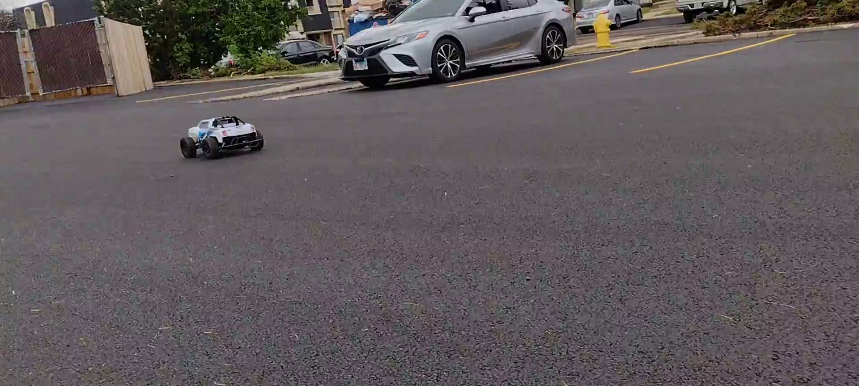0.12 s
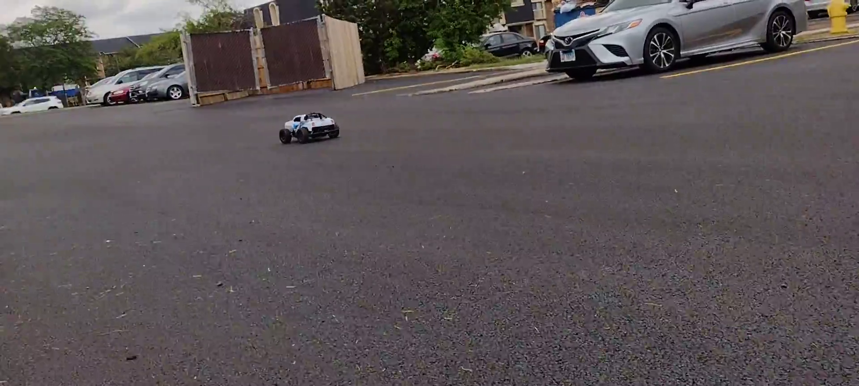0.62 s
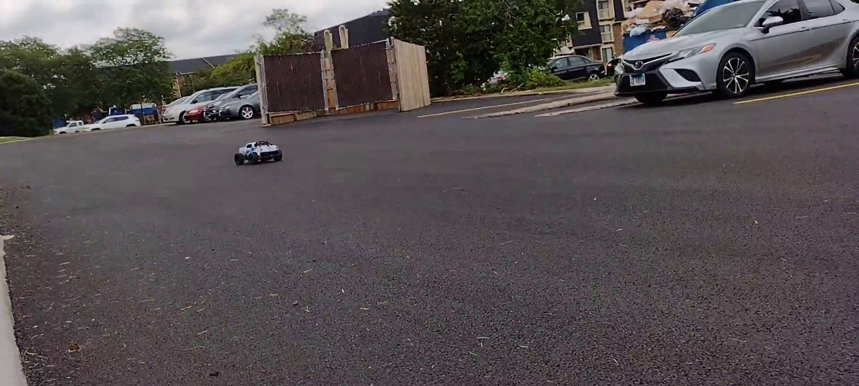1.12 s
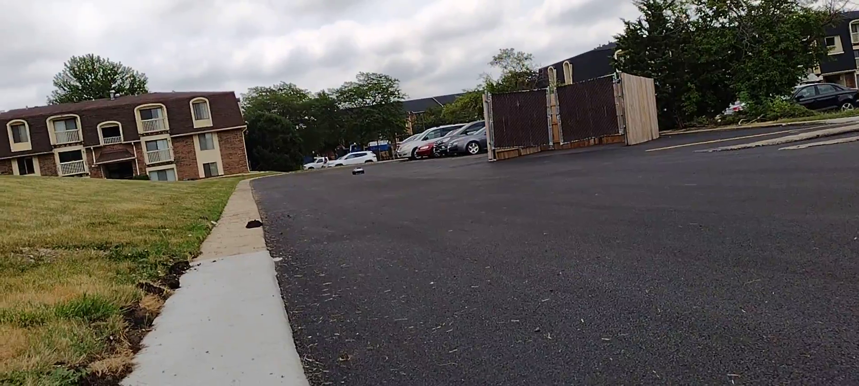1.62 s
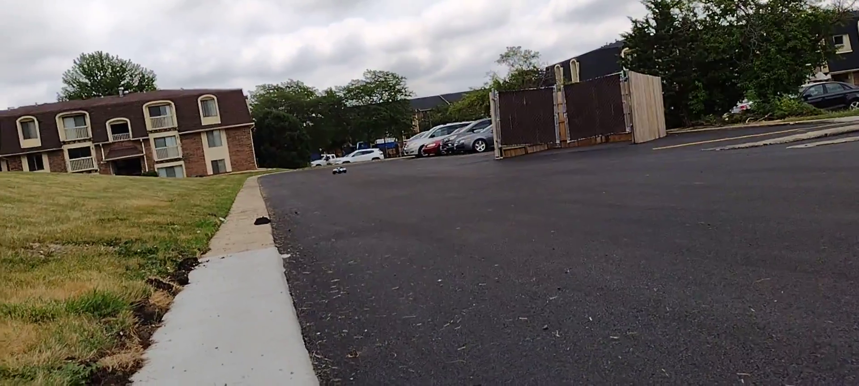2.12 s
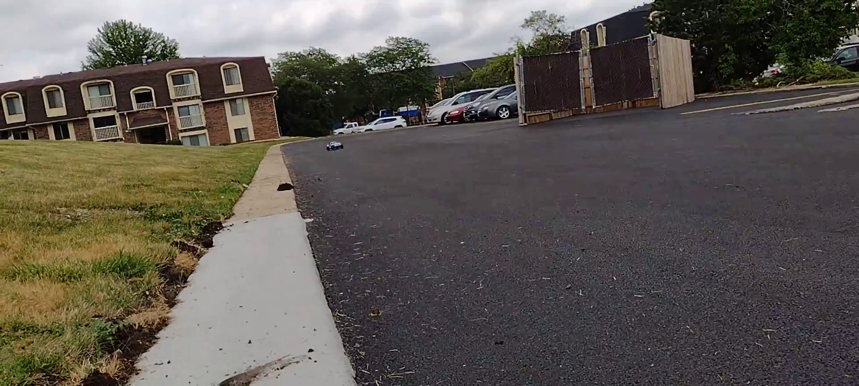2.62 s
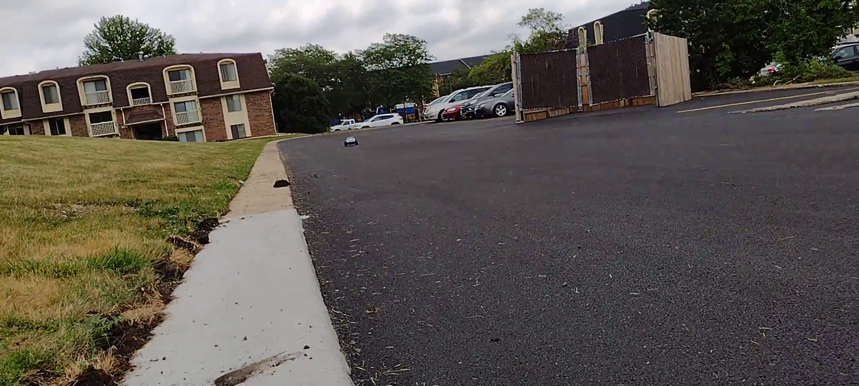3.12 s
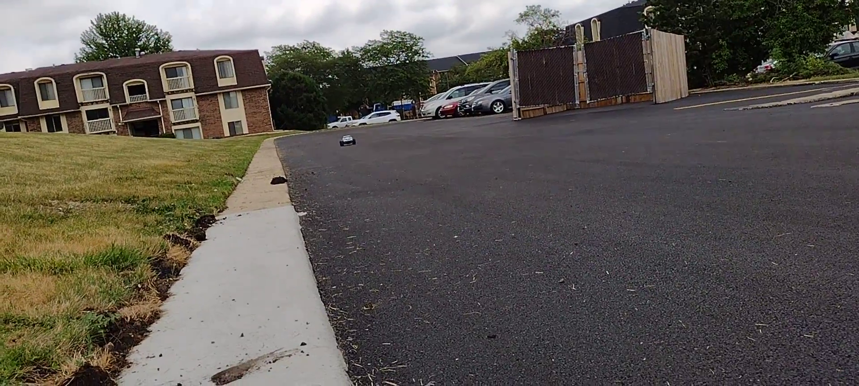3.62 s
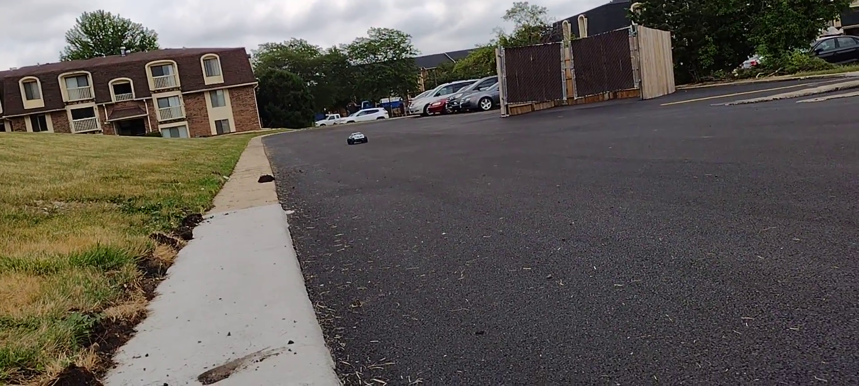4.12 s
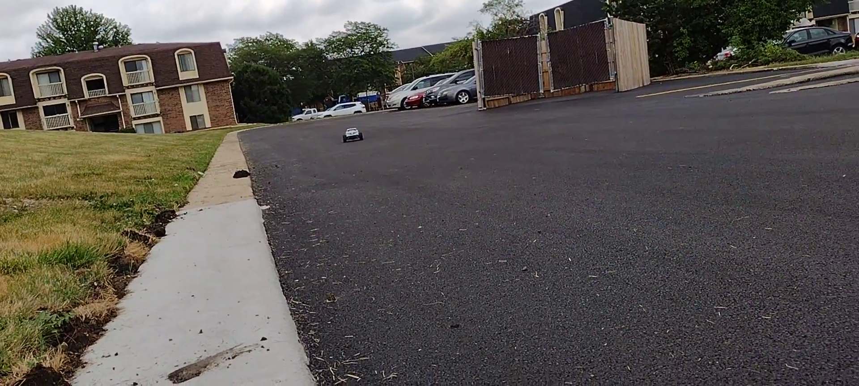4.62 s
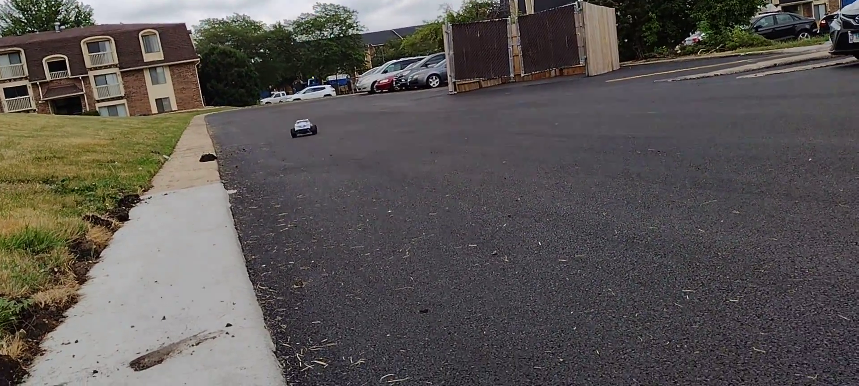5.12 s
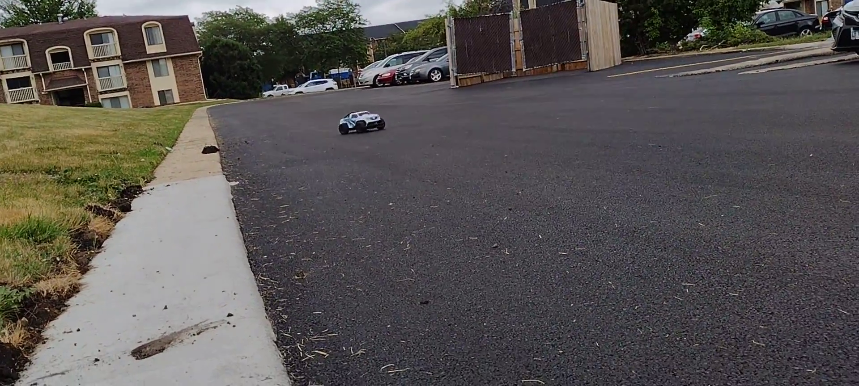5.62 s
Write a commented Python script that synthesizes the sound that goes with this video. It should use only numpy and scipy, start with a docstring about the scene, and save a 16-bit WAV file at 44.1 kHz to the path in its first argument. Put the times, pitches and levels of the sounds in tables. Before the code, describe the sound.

Outdoors on an asphalt lot, a small electric toy truck starts close with a bright, rough gear whine, squealing shaft and grainy tyre hiss, then drives away. The sound drops to silence twice. The truck almost vanishes under low machine hum and distant traffic while sparrows chirp, then approaches with swelling whine and ticking grit. Stereo microphone, left side dull, right side bright.

```python
"""A small electric model truck drives off across an asphalt lot and comes back, gears whining, tyres hissing:
wobbling, roughened tones for gears, motor and shaft, grainy coloured noise and ticks for the tyres.
A machine hums nearby in narrow tones; a faint tone swells over noise for distant traffic and light wind.
Sparrows chirp in gliding whistles and decaying sines knock near the microphone; the sound drops out twice.
The left microphone port is shaded and dull, the right one bright."""
import sys
import numpy as np
from scipy import signal
from scipy.fft import rfft, irfft, next_fast_len
from scipy.io import wavfile
from scipy.ndimage import uniform_filter1d

SR = 44100
rng = np.random.default_rng(int(sys.argv[2]) if len(sys.argv) > 2 else 0)


def volts_from_db(level):
    """Convert decibel levels to linear amplitude ratios."""
    exponent = np.asarray(level, float) / 20
    return 10 ** exponent


def store_pcm(level_fs):
    """Save levels as 16-bit WAV."""
    pcm = np.round(np.clip(level_fs, -1, 1) * 32767).astype(np.int16)
    wavfile.write(sys.argv[1], SR, np.atleast_2d(pcm).T)


N = 253575
T = np.arange(N) / SR  # s

# Stretches with sound. Each row: start in seconds, end in seconds.
HEARD = [(.0695, 1.1705), (1.4703, 2.4305), (2.7695, 5.76)]
# Gear mesh whine, one list a stretch. Each row: time in seconds, pitch in Hz, whine level in dB before
# the core and skirt trims, tyre hiss level in dB before its grain and mix.
GEARS = [
    [(.075, 2548, -45.5, -43), (.3, 2550, -48, -46), (.33, 2582, -48, -53), (1.165, 2558, -50.5, -56)],
    [(1.475, 2449, -49, -68), (1.6, 2452, -47.5, -69), (1.81, 2517, -48.5, -68), (1.93, 2476, -48, -69),
     (1.99, 2375, -50.5, -69), (2.28, 2375, -56.5, -74), (2.425, 2312, -73, -67.5)],
    [(2.77, 2426, -76, -76), (3.7, 2434, -68, -77.5), (4.05, 2312, -57, -71), (4.25, 2283, -58, -74),
     (4.4, 2364, -52.5, -75.5), (4.7, 2390, -47, -70.5), (4.98, 2494, -42.5, -63.5),
     (5.3, 2493, -39.5, -59.5), (5.42, 2573, -40.5, -58.5), (5.49, 2495, -39, -59),
     (5.58, 2527, -36.5, -56.5), (5.75, 2484, -39.5, -54.5)],
]
# Overtones of the gear mesh, which fade with distance like the hiss.
# Each row: multiple of the pitch, level in dB against the tyre hiss once the truck faces the microphone.
MESH_OVERTONES = [(3, -5), (4, -10), (5, -11), (6, -30)]
# Boom of the plastic body. Each row: pitch in Hz, a third of the blur in Hz, level in dB against the gears.
SHELL_MODES = [(586, 98, -16.5), (912, 65, -12.5), (1230, 41, -19)]
# Motor whine under load. Each row: time in seconds, pitch in Hz, level in dB before a trim.
MOTOR = [
    [(.075, 1620, -48.5), (.45, 1697, -49.5), (1.165, 1806, -61.5)],
    [(2.375, 1830, -52.5), (2.43, 1847, -61)],
    [(2.8, 1684, -68), (3.4, 1830, -61), (3.8, 1850, -79)],
]
# Upper whine, lower in pitch as the truck nears. Each row: time in seconds, pitch in Hz, level in dB.
UPPER = [
    [(.075, 5140, -81), (.35, 5384, -61), (.7, 5200, -70)],
    [(5.15, 5150, -69), (5.3, 5280, -63), (5.5, 5050, -61), (5.68, 4850, -60), (5.75, 4950, -59)],
]
# Drive shaft squeal. Each row: time in seconds, pitch in Hz, level in dB before a trim.
SHAFT = [
    [(.085, 3268, -39), (.52, 3360, -41.5), (.58, 3385, -52), (.95, 3460, -48.5)],
]
# Colour of the tyre hiss. Each row: frequency in Hz, relative density in dB per Hz.
TYRES = [(1760, -32.5), (3000, 13), (3350, 7), (4470, -7), (5160, 0.5), (6390, -16), (7400, -13.5),
         (8410, -1.5), (11300, -1), (13200, -11), (14600, -23), (15800, -45.5)]
# Grit under the tyres. Each row: start in seconds, level in dB before colouring.
GRIT = [(1.0615, -57), (3.3922, -65), (4.4726, -69), (4.9716, -57), (5.17, -57), (5.254, -48),
        (5.3435, -52), (5.3886, -51), (5.6185, -51), (5.6344, -49), (5.689, -56)]
# Colour of the grit. Each row: frequency in Hz, gain in dB.
GRIT_COLOUR = [(1000, -30), (3000, -6), (6000, -2), (8500, 6), (11500, 9), (13500, 4), (15500, -16)]
# Machine hum. Each row: time in seconds, mean main tone level in dB, mean lower tone level in dB.
HUM = [(.075, -37, -41.5), (1.15, -34, -41.5), (1.6, -32, -52), (2.4, -37.5, -43.5), (2.8, -41, -51),
       (3.65, -42, -43), (4.0, -43.5, -42.5), (5.0, -42, -47), (5.4, -45.5, -69), (5.75, -54.5, -41)]
# Weak partials of the machine. Each row: frequency in Hz, mean level in dB.
HUM_PARTIALS = [(163, -51.5), (286, -55), (572, -61.5), (1224, -80.5), (1335, -72.5), (1558, -69.5)]
# Swells of the faint tone. Each row: middle in seconds, half length in seconds, level in dB at the middle.
FAR_TONE = [(3.37, 0.39, -55.5), (4.312, 0.28, -54)]
# Colour of the distant traffic. Each row: frequency in Hz, relative density in dB per Hz.
TRAFFIC = [(18, -54.5), (30, -22.5), (83, -10), (114, 0), (156, -10), (208, -6.5), (284, -8.5), (420, -13),
           (575, -14), (808, -19), (996, -17), (1170, -22.5), (1870, -24.5), (3680, -29), (8000, -52.5),
           (16000, -73)]
# Loudness of the distant traffic. Each row: time in seconds, mean level in dB.
TRAFFIC_DB = [(.075, -40.5), (1.15, -41.5), (2.4, -43), (3.1, -44), (4.5, -43), (5.75, -41)]
# Chirps that climb to a top note and fall again.
# Each row: time of the top in seconds, top in Hz, climb in seconds, fall in seconds, level in dB.
CHIRPS = [(.187, 5110, .004, 0.017, -48.5), (0.221, 5310, 0.015, 0.01, -48),
          (0.292, 4730, 0.021, 0.011, -45), (0.781, 4970, 0.027, 0.049, -49.5),
          (0.813, 4730, 0.011, 0.026, -49.5), (0.895, 4710, 0.022, 0.018, -45.5),
          (1.018, 5500, 0.013, 0.008, -54), (1.056, 4920, 0.0018, 0.04, -53),
          (1.638, 5450, .024, 0.03, -52), (1.662, 4630, 0.0038, 0.017, -57),
          (1.743, 4820, 0.024, .012, -50), (2.345, 5820, 0.023, 0.005, -57),
          (2.345, 4970, 0.00107, 0.0184, -51.5), (2.42, 4820, 0.011, 0.0018, -67),
          (2.811, 5400, 0.01, 0.011, -69), (3.168, 5500, .006, 0.00618, -70),
          (3.193, 4700, 0.002, .011, -63), (3.245, 5710, 0.015, 0.009, -58), (3.332, 5100, .018, .003, -64),
          (3.681, 5330, .016, 0.0047, -58.5), (3.69, 5730, .003, .02, -63),
          (3.755, 4480, .012, 0.0017, -61), (3.979, 4940, 0.021, .001, -63), (4.081, 4300, .016, .001, -53),
          (4.062, 3500, 0.015, .001, -64), (4.468, 5690, .016, 0.015, -53.5),
          (4.55, 5000, 0.026, .001, -58.5), (4.736, 5300, 0.011, 0.025, -53.5),
          (5.7, 5010, 0.0073, 0.019, -54.5)]
# Level pips, slightly arched. Each row: start in seconds, length in seconds, pitch in Hz, level in dB.
PIPS = [(0.13, 0.034, 6300, -59), (1.108, .048, 3230, -46), (1.035, .022, 4900, -53.5),
        (1.644, .014, 5000, -52), (1.704, 0.02, 3500, -50), (3.175, .018, 4750, -61),
        (3.222, .013, 3680, -62), (3.251, .018, 4900, -61), (3.275, .012, 3900, -55),
        (3.298, 0.015, 3850, -55), (3.336, .006, 3700, -60), (3.377, 0.021, 3050, -54.5),
        (3.975, 0.045, 4970, -64), (4.082, .028, 5000, -62), (4.482, 0.015, 4200, -57),
        (4.696, 0.02, 6630, -69)]
# Knocks. Each row: start in seconds, level in dB before onset and decay, pitch in Hz, 60 dB decay in seconds.
KNOCKS = [(.278, -33.5, 604, 0.099), (.298, -31, 636, 0.076), (0.406, -13.5, 124.8, 0.025),
          (2.01, -21, 91.7, 0.11), (5.226, -39, 1230, 0.046), (5.542, -36, 898, .08),
          (5.715, -35, 910, .07)]
# Shading of the left port against the right. Each row: frequency in Hz, gain in dB.
SHADE = [(60, -1.1), (110, -0.65), (200, 0.5), (380, -0.5), (700, 0), (1290, -1.5), (2380, -5), (4400, -14),
         (8120, -16), (15000, -15)]
# Likeness of wide noise at the two ports. Each row: frequency in Hz, likeness from 0 to 1.
ALIKE = [(60, 1), (130, 1), (290, 0.93), (640, 0.76), (1410, 0.37), (3100, 0.2), (6820, 0.12),
         (15000, 0.05)]

TURN_S, TURN_LENGTH_S = 3.7, 0.6  # the truck turns to face the microphone


def on_log(hz, table):
    """Read a (Hz, value) table on a log-frequency axis."""
    f, v = np.transpose(table)
    return np.interp(np.log(np.maximum(hz, 1)), np.log(f), v)


def colour(x, table):
    """Filter by a (Hz, dB) table."""
    n = next_fast_len(N)
    hz = np.arange(n // 2 + 1) * SR / n
    return irfft(rfft(x, n) * volts_from_db(on_log(hz, table)), n)[..., :N]


def unit(x):
    """Scale to rms 1."""
    return x / np.sqrt(np.mean(x ** 2))


def walk(rate):
    """Smooth chance that turns about rate times a second, spread 1."""
    k = max(int(SR / rate), 1)
    return unit(uniform_filter1d(uniform_filter1d(rng.standard_normal(N), k), k))


def curves(tables, edge_s):
    """A gate that opens while each table lasts, then the tables' columns over time."""
    s, *columns = np.transpose(np.concatenate(tables))
    gate = sum(np.clip(np.minimum(T - t[0][0], t[-1][0] - T) / edge_s + 1, 0, 1) for t in tables)
    return np.minimum(gate, 1), *(np.interp(T, s, c) for c in columns)


def whine(hz, rough, blur_hz, wobble_hz):
    """A tone whose pitch wobbles; the rough share of its power is spread into a narrow band."""
    phase = 2 * np.pi * np.cumsum(hz + wobble_hz * walk(36.3)) / SR
    rough = np.clip(rough, 0, 1)
    blur = (walk(blur_hz) + 1j * walk(blur_hz)) / np.sqrt(2)
    envelope = np.sqrt(1 - rough) + np.sqrt(rough) * blur
    return np.sqrt(2) * np.real(envelope * np.exp(1j * phase))


def wide_noise(table):
    """Coloured noise, alike on both ports in the bass and less so in the treble."""
    alike = [(hz, np.clip(c, 0, .99)) for hz, c in ALIKE]
    mid = colour(rng.standard_normal(N), [(hz, 10 * np.log10(1 + c)) for hz, c in alike])
    side = colour(rng.standard_normal(N), [(hz, 10 * np.log10(1 - c)) for hz, c in alike])
    return colour(np.array([mid + side, mid - side]), table)


def late(pair, lag_s):
    """Delay the right port."""
    return np.array([pair[0], np.roll(pair[1], int(lag_s * SR))])


def spread(x, room_db):
    """Both ports, each with its own outdoor scatter."""
    decay = np.exp(-np.arange(6000) / (0.034 * SR))
    tails = rng.standard_normal((2, 6000)) * decay / np.sqrt(0.069 * SR)
    return x + volts_from_db(room_db) * signal.fftconvolve(x[None], tails, axes=1)[:, :N]


def gears():
    """Meshing teeth whine, roughened by unevenness; the overtones beam forward and the body booms along."""
    skirt_db, skirt_gain, near_db = -6, 0.2, -38  # skirt against whine at near_db, extra dB per dB
    away_db = -12  # overtones before the truck turns to face the microphone
    _, hz, db, tyre_db = curves(GEARS, edge_s=.01)
    # a narrow core inside a wide skirt; the skirt gains as the truck gets loud and near
    out = volts_from_db(db - 3) * whine(hz, rough=0.7, blur_hz=230, wobble_hz=6)
    out += volts_from_db(db + skirt_db + skirt_gain * (db - near_db)) * whine(hz, rough=1, blur_hz=400, wobble_hz=10)
    beam_db = away_db * np.clip((TURN_S + TURN_LENGTH_S - T) / TURN_LENGTH_S, 0, 1)
    for k, overtone_db in MESH_OVERTONES:
        overtone = whine(k * hz, rough=1, blur_hz=260 * k, wobble_hz=20)
        out += volts_from_db(tyre_db + beam_db + overtone_db) * overtone
    for mode_hz, blur_hz, mode_db in SHELL_MODES:
        out += volts_from_db(db + mode_db) * whine(mode_hz, rough=0.99, blur_hz=3 * blur_hz, wobble_hz=3)
    return out


def motor():
    """The motor under load: a roughened tone that glides in pitch."""
    gate, hz, db = curves(MOTOR, edge_s=0.045)
    return gate * volts_from_db(db - 0.5) * whine(hz, rough=0.75, blur_hz=260, wobble_hz=8)


def upper_whine():
    """A faint high whine, wholly blurred into a narrow band."""
    gate, hz, db = curves(UPPER, edge_s=0.11)
    return gate * volts_from_db(db) * whine(hz, rough=1.0, blur_hz=300, wobble_hz=30)


def shaft():
    """The drive shaft squeals in one burst a wheel turn."""
    wheel_turns, first_burst_s = 29.1, 0.132  # per second, s
    gate, hz, db = curves(SHAFT, edge_s=0.01)
    burst = np.exp(0.68 * np.cos(2 * np.pi * wheel_turns * (T - first_burst_s)))
    return gate * volts_from_db(db - 2.5) * unit(burst) * whine(hz, rough=0.75, blur_hz=560, wobble_hz=45)


def tyres():
    """Tread grips the asphalt unevenly, so the hiss is grainy; grit ticks in short noise bursts."""
    _, _, _, tyre_db = curves(GEARS, edge_s=.01)
    grain = volts_from_db(tyre_db + 1.4 * walk(60) + 1.4 * walk(400))
    shared = unit(colour(rng.standard_normal(N), TYRES))
    hiss = grain * (0.55 * shared + 0.83 * unit(wide_noise(TYRES)))
    ticks = np.zeros(N)
    decay = np.exp(-np.arange(800) / (0.0042 * SR))
    for s, db in GRIT:
        i = int(s * SR)
        ticks[i:i + 800] += volts_from_db(db) * rng.standard_normal(800) * decay
    return hiss + colour(ticks, GRIT_COLOUR)


def truck():
    """Whines and tyres reach the right port slightly late; the whines lean left once the truck has turned."""
    whines = gears() + motor() + upper_whine() + shaft()
    left_db = 2.5 * np.clip((T - TURN_S) / TURN_LENGTH_S, 0, 1)  # left against right
    lean = volts_from_db(left_db * np.array([[.5], [-.5]]))
    return late(lean * spread(whines, room_db=-18.5), lag_s=.00007) + late(tyres(), lag_s=.00015)


def hum():
    """A nearby machine: two wavering low tones and weak partials."""
    main_hz, lower_hz = 110.1, 79.2
    _, main_db, lower_db = curves([HUM], edge_s=.01)
    main_db = main_db + 0.72 * walk(3.4)
    out = volts_from_db(main_db) * whine(main_hz, rough=0.049, blur_hz=24.87, wobble_hz=1.32)
    out += volts_from_db(lower_db + 1.7 * walk(6.7)) * whine(lower_hz, rough=0.49, blur_hz=7.1, wobble_hz=1.8)
    for hz, db in HUM_PARTIALS:
        out += volts_from_db(db + 2 * walk(3.1)) * whine(hz, rough=0.6, blur_hz=16, wobble_hz=1.5)
    # reflections make the main tone differ a little between the ports
    side = volts_from_db(main_db - 15) * whine(main_hz, rough=1, blur_hz=30, wobble_hz=0.98)
    return out + side * np.array([[1], [-1]])


def traffic():
    """Distant traffic blends into a broad wash of noise that wavers slightly."""
    db = np.interp(T, *np.transpose(TRAFFIC_DB)) + 0.64 * walk(16) + 0.28 * walk(7.3)
    return unit(wide_noise(TRAFFIC)) * volts_from_db(db)


def wind():
    """Light wind on each port: separate low noise, stronger on the left."""
    wind_colour = [(15, -16.0), (40, -7), (70, 7.0), (200, -42.5), (2000, -64)]  # (Hz, dB)
    rumble = unit(colour(rng.standard_normal((2, N)), wind_colour))
    return rumble * volts_from_db(np.array([[-56], [-64]]) + 3 * walk(4.4))


def sparrows():
    """Husky whistles gliding in pitch, with a short scatter off the house fronts."""
    climb_hz_per_s, fall_hz_per_s, round_top_s = 78000, 81000, 0.0047
    arch_hz_per_s = 7600  # how far the ends of a pip lie under its middle, per second of length
    strokes = []
    for s, top_hz, climb, fall, db in CHIRPS:
        t = np.arange(-int(climb * SR), int(fall * SR)) / SR
        slope = np.where(t < 0, climb_hz_per_s, fall_hz_per_s)
        hz = top_hz - slope * (np.hypot(t, round_top_s) - round_top_s)
        strokes.append((s - climb, hz, db))
    for s, length, hz, db in PIPS:
        u = np.linspace(-1, 1, int(length * SR))
        strokes.append((s, hz - arch_hz_per_s * length * u ** 2, db))
    out = np.zeros(N, complex)
    for s, hz, db in strokes:
        swell = np.sin(np.pi * np.arange(len(hz)) / len(hz)) ** 0.38
        i = int(s * SR)
        out[i:i + len(hz)] += volts_from_db(db) * swell * np.exp(2j * np.pi * np.cumsum(hz) / SR)
    # the syrinx flutters, which smears each whistle
    husk = 1 + .55 * (walk(500) + 1j * walk(500))
    return spread(np.real(out * husk), room_db=3)


def knocks():
    """Short dull thumps near the microphone: sines with a soft onset and a quick decay."""
    out = np.zeros(N)
    for s, db, hz, t60 in KNOCKS:
        t = np.maximum(T - s, 0)
        decay = np.exp(-np.log(1000) * t / t60)
        onset = 1 - np.exp(-t / 0.0037)
        out += volts_from_db(db) * np.sin(2 * np.pi * hz * t) * decay * onset
    return out


def far_tone():
    """A faint, slightly wavering tone near 1 kHz that swells and fades."""
    swells = sum(volts_from_db(db) * np.exp(-((T - s) / half) ** 2) for s, half, db in FAR_TONE)
    return swells * whine(997, rough=0.17, blur_hz=40.3, wobble_hz=3.6)


def scene():
    """All sources, with the sound cut quickly between the stretches."""
    edge_s = .0004
    gate = 0
    for start, end in HEARD:
        ramp = np.clip(np.minimum(T - start, end - T) / edge_s, 0, 1)
        gate = gate + np.sin(np.pi / 2 * ramp) ** 2
    return (truck() + hum() + traffic() + wind() + sparrows() + knocks() + far_tone()) * gate


def top_cut(x):
    """Nothing passes above the cut-off."""
    return signal.sosfilt(signal.butter(12, 16420, fs=SR, output="sos"), x)


def record(dry):
    """The shaded left port loses treble; the right one gains what it loses."""
    share = [(hz, volts_from_db(db)) for hz, db in SHADE]
    left = colour(dry[0], [(hz, 20 * np.log10(2 * g / (1 + g))) for hz, g in share])
    right = colour(dry[1], [(hz, 20 * np.log10(2 / (1 + g))) for hz, g in share])
    return top_cut(np.array([left, right]))


dry = scene()
out = record(dry)
store_pcm(out)
```